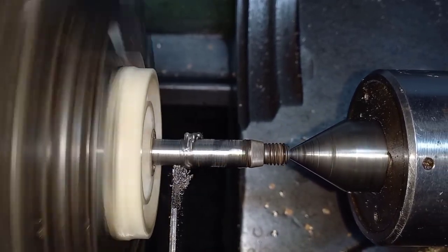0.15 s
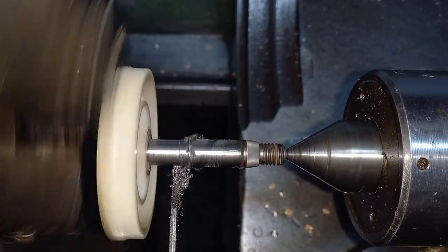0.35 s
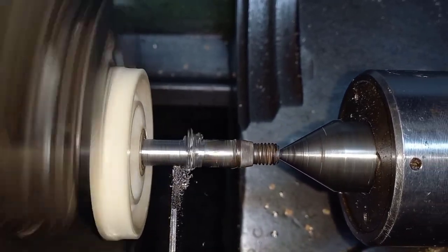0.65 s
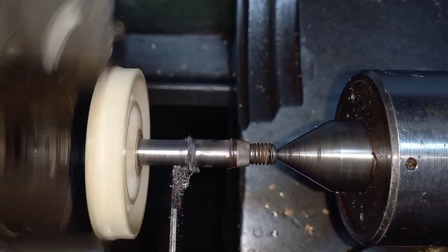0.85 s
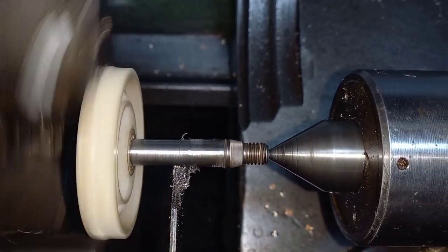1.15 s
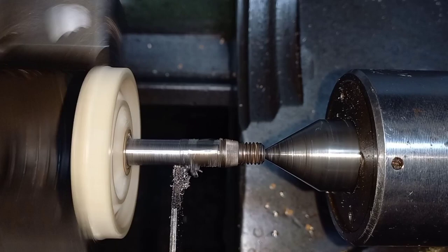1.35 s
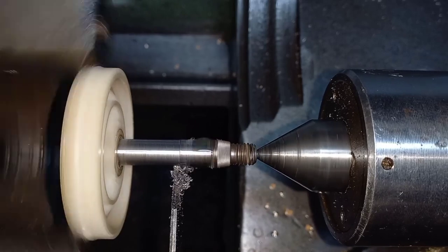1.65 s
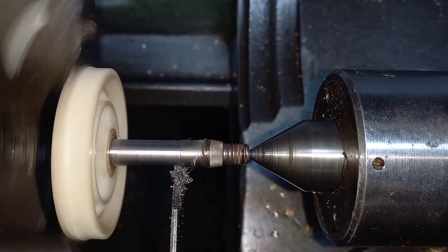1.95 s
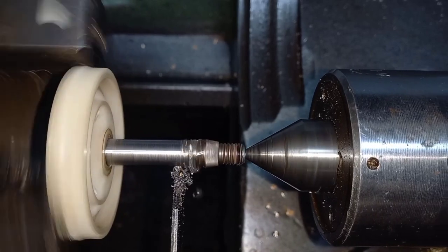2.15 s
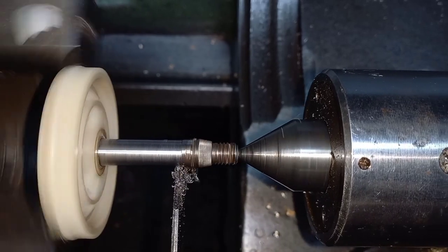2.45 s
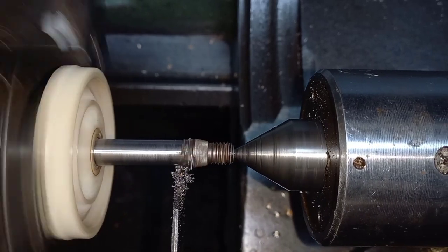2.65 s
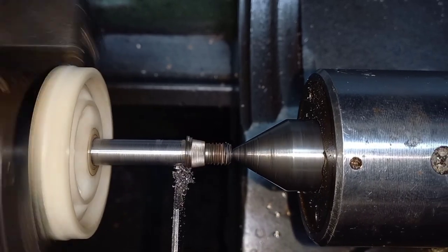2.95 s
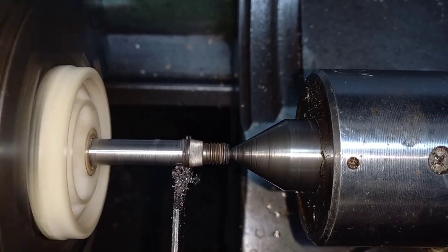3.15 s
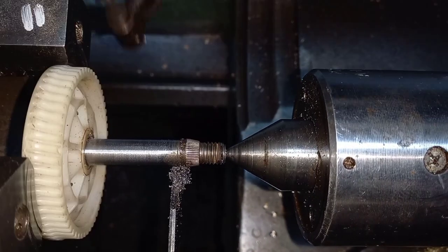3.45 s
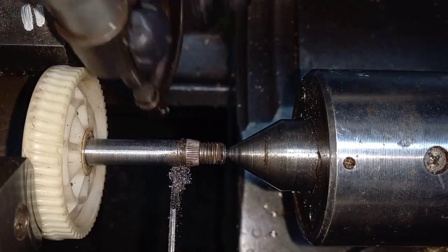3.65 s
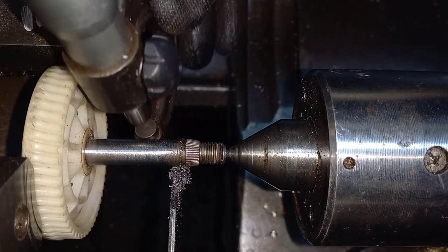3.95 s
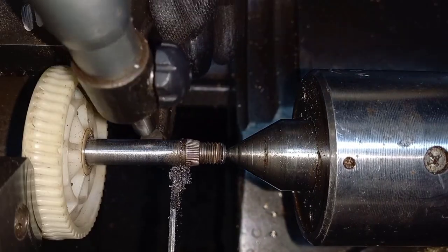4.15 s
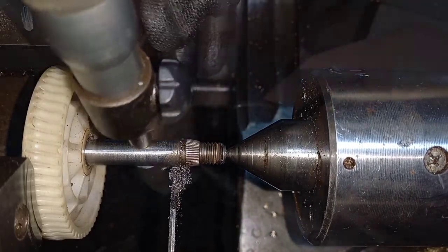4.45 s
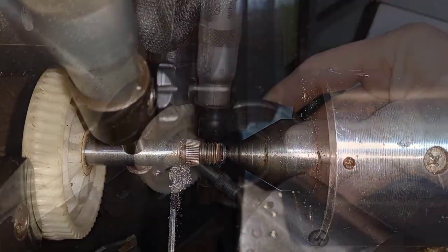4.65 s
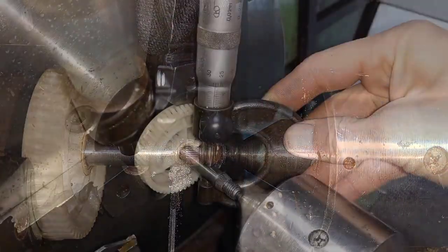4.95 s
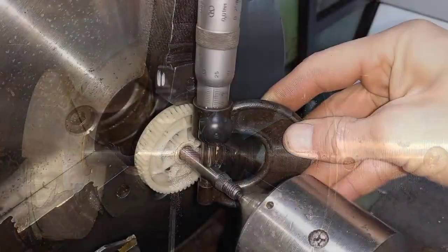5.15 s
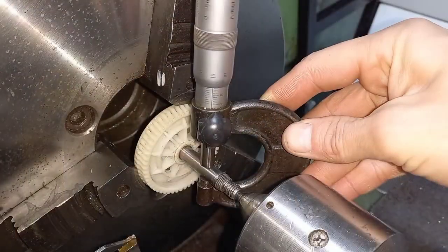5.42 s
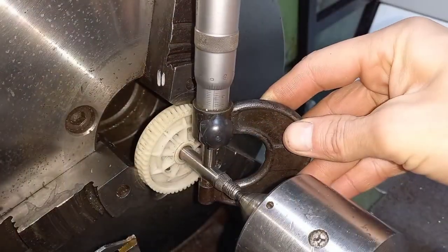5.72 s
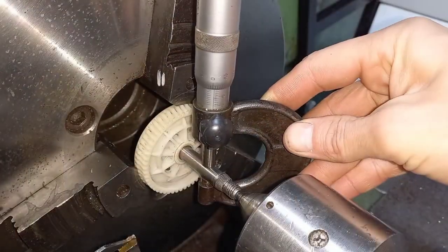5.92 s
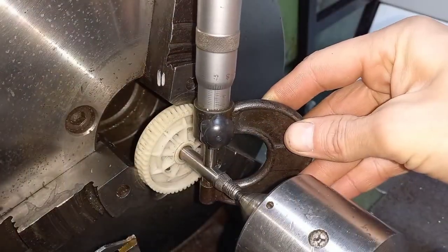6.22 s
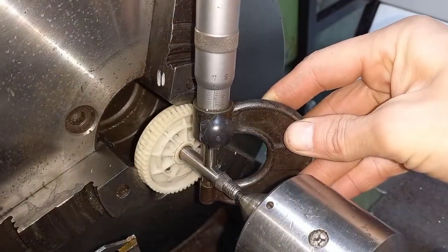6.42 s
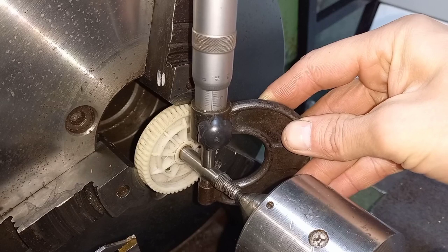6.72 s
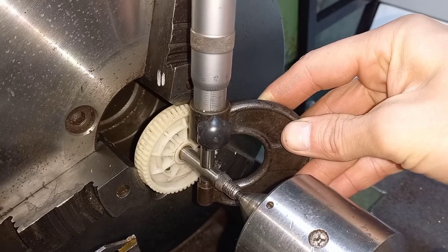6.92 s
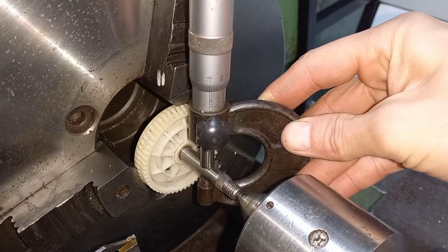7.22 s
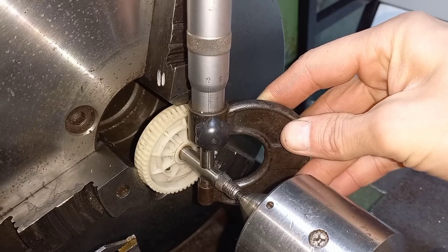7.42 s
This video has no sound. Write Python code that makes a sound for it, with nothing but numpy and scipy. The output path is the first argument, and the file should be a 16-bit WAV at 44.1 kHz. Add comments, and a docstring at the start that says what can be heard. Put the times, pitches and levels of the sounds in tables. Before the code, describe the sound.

In a workshop, a small metal lathe turning a shaft is heard unnaturally fast: steady bright hiss, thin whines and a fast buzzing throb. It cuts abruptly to a much louder, lower idling roar with motor hum and gear chatter. Another hard cut leaves quiet hiss, muffled distant thumps, faint steel ticks and several sharp micrometer ratchet clicks with short echoes. Close stereo microphone.

```python
"""A small metal lathe in a workshop, three scenes cut end to end. First it turns a shaft, heard eight times too fast:
whining tones over shaped noise that throbs once a spindle turn. Then it idles at true speed: hum tones, and noise
that chatters with a shaft. Last it is off: over hiss and dull far thumps (decaying noise), a micrometer ticks on
steel and its ratchet clicks (noise cracks, echo tails and decaying sines)."""
import sys
import numpy as np
from scipy import signal
from scipy.fft import rfft, irfft
from scipy.io import wavfile
from scipy.ndimage import uniform_filter1d

SR = 44100
rng = np.random.default_rng(int(sys.argv[2]) if len(sys.argv) > 2 else 0)


def dump_mix(stems):
    """Bounce the given channels to the path in sys.argv[1] as a 16-bit WAV at rate SR."""
    frames = np.atleast_2d(stems).T  # one column per channel
    limited = np.clip(frames, -1, 1)  # hard clip at full scale
    pcm = np.round(limited * 32767).astype(np.int16)
    wavfile.write(sys.argv[1], SR, pcm)


N = 334278


def amp(db):
    """Decibels to gain."""
    return 10 ** (np.asarray(db) / 20)


def evened(x):
    """Scales the whole array to rms 1."""
    return x / np.sqrt(np.mean(x ** 2) + 1e-20)


def read(points, hz):
    """Interpolates a spectrum on a log-frequency axis."""
    f, value = np.transpose(points)
    return np.interp(np.log(hz + 1), np.log(f + 1), value)


def wander(shape, rate_hz):
    """Low-passed random drift of rms 1 along the last axis."""
    white = rng.standard_normal(shape)
    return evened(signal.lfilter(*signal.butter(1, rate_hz, fs=SR), white))


def bell_db(hz, f, width_hz, height_db):
    """One bell-shaped rise or dip of a spectrum, in dB."""
    return height_db / (1 + (2 * (hz - f) / width_hz) ** 2)


def noise(n, colour, ports, bells=(), patchy_db=0., size=2048):
    """Stereo noise of rms 1 from random short-time spectra with drifting patches, partly alike at the two ports."""
    hop, hz = size // 4, np.fft.rfftfreq(size, 1 / SR)
    a, b, c, d, patches = rng.standard_normal((n // hop + 5, len(hz), 5)).T
    patches = uniform_filter1d(patches, size=size // 128, axis=0)  # over frequency
    patches = evened(uniform_filter1d(patches, size=5, axis=1))  # over time
    db = read(colour, hz) + sum(bell_db(hz, *row) for row in bells)
    level = amp(db[:, None] + patchy_db * patches)
    same, lead_rad, pan_db = (read(np.array(ports)[:, [0, k]], hz)[:, None] for k in (1, 2, 3))
    same = np.clip(same, 0, 1)
    left, other = a + 1j * b, c + 1j * d
    right = same * np.exp(-1j * lead_rad) * left + np.sqrt(1 - same ** 2) * other
    spectra = np.array([left * amp(pan_db / 2), right * amp(-pan_db / 2)]) * level
    return evened(signal.istft(spectra, nperseg=size, noverlap=size - hop)[1][:, :n])


def tones(t, families, strays, ports, slip_rad, waver_db, apart_db, rate_hz):
    """Sines whose phase slips and strength wavers; the balance of the ports can waver too."""
    rows = [(k * base_hz, *row) for base_hz, family in families.items() for k, *row in family]
    out = np.zeros((2, len(t)))
    for hz, db, pan_db in rows + strays:
        drift, both, apart = wander((3, len(t)), rate_hz)
        lead_rad = read(np.array(ports)[:, [0, 2]], hz)
        phase = 2 * np.pi * (hz * t + rng.random()) + slip_rad * drift - np.array([[0], [lead_rad]])
        tilt_db = np.array([[.5], [-.5]]) * (pan_db + apart_db * apart)
        out += np.sqrt(2) * amp(db + waver_db * both + tilt_db) * np.sin(phase)
    return out


# lathe-off noise at the two ports: (frequency [Hz], likeness [0-1], left lead [rad], left minus right [dB])
OFF_PORTS = [(60, 0.97, -0.072, 1), (170, 0.96, -0.28, 1), (350, 0.76, 0.1, -3), (520, 0.48, 0.5, 2),
             (700, 0.23, 0.5, -4.5), (1030, 0.23, 2, -1), (1500, 0.11, 0.6, -3.5), (3000, 0.092, .5, -1.5),
             (15000, .05, .5, 0.5)]
# air and microphone hiss: (frequency [Hz], relative density [dB per Hz])
HISS = [(29, -46), (50, -25), (72, -14), (93, 3), (206, -2), (829, -15), (1030, -18.5), (1370, -19),
        (1740, -26.5), (2820, -26), (4560, -32), (6230, -30.5), (15500, -31.5)]
HISS_DB = -61.5


def hiss(t):
    """Air and microphone hiss: steady shaped noise with drifting patches."""
    return amp(HISS_DB) * noise(len(t), HISS, OFF_PORTS, patchy_db=3.0)


# far blows: (time [s], level [dB], deep part over level [dB], knock over level [dB])
THUMPS = [(4.969, -50.5, -8, -4.5), (5.166, -52.5, -11, -16), (5.195, -55.5, -2, -8),
          (5.401, -49, -0.5, -6.5), (5.571, -49, -15, -6.5), (5.658, -46, -8, -17), (5.789, -59, 1, -4.5),
          (6.025, -55, -15, -7), (6.338, -61, 4, 6), (6.397, -52, -2, -3), (6.499, -52, 2, 5),
          (6.569, -48.5, -4, -6.5), (6.681, -45, -10, -7), (6.719, -53.5, -13, -5), (6.79, -51.5, -14, -17),
          (7.029, -50, -7, -10), (7.177, -56, -11, 0), (7.259, -54, -1, -4.5), (7.369, -55, -15.5, -11),
          (7.448, -49, -13, -13), (7.538, -51, -2, -6.5)]
# registers: (frequency [Hz], relative density [dB per Hz])
DEEP = [(25, -70), (50, -40), (80, -16), (100, -1), (140, 12), (180, -15), (240, -31), (600, -73)]
BOOM = [(50, -69.5), (150, -25), (230, -1), (300, 0), (400, 0.5), (550, -4), (800, -10), (1000, -34),
        (2500, -73)]
KNOCK = [(200, -68.5), (500, -29), (750, 2), (1000, -3.5), (1300, 0), (1550, -9.5), (1800, -16.5),
         (4000, -19.5), (9000, -29), (16000, -54)]
DEEP_T60_S, BOOM_T60_S, KNOCK_T60_S = 0.57, 0.47, .42  # hall decay
DEEP_RISE_S, BOOM_RISE_S, KNOCK_RISE_S = .013, 0.0044, .002  # time constants of power


def thumps(t):
    """Far blows as reverberant noise in three registers: a short swell, then decay; powers add."""
    s, db, deep_db, knock_db = np.transpose(THUMPS)[..., None]
    age = np.maximum(t - s, 0)
    registers = [(DEEP, deep_db, DEEP_RISE_S, DEEP_T60_S),
                 (BOOM, 0, BOOM_RISE_S, BOOM_T60_S),
                 (KNOCK, knock_db, KNOCK_RISE_S, KNOCK_T60_S)]
    out = 0
    for colour, over_db, rise_s, t60_s in registers:
        power = (1 - np.exp(-age / rise_s)) * amp(db + over_db - 60 * age / t60_s) ** 2
        rumble = noise(len(t), colour, OFF_PORTS, patchy_db=0.5, size=1024)
        out = out + np.sqrt(power.sum(axis=0)) * rumble
    return out


# micrometer frame modes: (frequency [Hz], relative level [dB], t60 [s])
FRAME = [(932, 2, 0.068), (1534, -12, 0.086), (2220, -19, 0.025)]
# contact bands: (frequency [Hz], width [Hz], rise or dip before a random weight [dB])
CONTACT_BANDS = [(3490, 100, 8.5), (4560, 140, 0.5), (5280, 170, 10), (6200, 190, 7), (7200, 350, 4),
                 (8650, 340, 2.5), (10050, 300, 2), (12200, 490, -1), (13200, 590, 10), (15300, 550, 5)]
CLICK_RISE_S, CRACK_T60_S = 0.00086, 0.013


def clicks(t, events, colour, pan_db, near_db, near_t60_s, far_db, far_t60_s):
    """Each click: a dense crack of steel, uneven echoes off machine bed and walls, and a frame ring."""
    age, out = np.arange(SR // 4) / SR, np.zeros((2, len(t) + SR))
    hz = np.fft.rfftfreq(len(age), 1 / SR)
    rise = (1 - np.exp(-age / CLICK_RISE_S)) ** 3
    bands_db = np.array([bell_db(hz, *row) for row in CONTACT_BANDS])
    ring = sum(amp(db - 60 * age / t60_s) * np.sin(2 * np.pi * f * age) for f, db, t60_s in FRAME)
    fall = np.hypot(amp(near_db - 60 * age / near_t60_s), amp(far_db - 60 * age / far_t60_s))
    tilt_db = np.array([[[0]], [[-3.]]]) * np.log2(1 + hz / 2000)  # echoes come back duller
    pan = amp([[pan_db / 2], [-pan_db / 2]])
    for s, peak_db, frame_db in events:
        # every contact excites the bands differently
        ringing_db = rng.uniform(.4, 1.17, len(CONTACT_BANDS)) @ bands_db
        spectra = rfft(rng.standard_normal((2, 2, len(age))))
        crack, tail = irfft(spectra * amp(read(colour, hz) + ringing_db + tilt_db), len(age))
        crack *= rise * amp(-60 * age / CRACK_T60_S)
        crack /= abs(crack).max(axis=1, keepdims=True)
        tail = evened(tail) * rise * fall * amp(2.5 * wander(len(age), 150))
        sound = (crack + tail) * pan + amp(frame_db) * rise * ring
        out[:, round((s - t[0]) * SR):][:, :len(age)] += amp(peak_db) * sound
    return out[:, :len(t)]


# gauge touching steel: (time [s], crack peak [dB], frame ring over peak [dB])
TICKS = [(5.281, -51.5, -21), (5.3916, -57, -18), (5.405, -52, -18), (5.471, -48.5, -18),
         (5.509, -50.5, -20), (5.784, -46, -24), (5.7956, -41, -19), (5.8194, -58, -18), (5.863, -53, -22),
         (5.8885, -55, -18), (6.2432, -51, -26), (6.3083, -47, -18), (6.89, -48.5, -14), (6.909, -53, -21),
         (7.0944, -44, -19), (7.374, -49, -4)]
# tick: (frequency [Hz], relative density [dB per Hz])
TICK_COLOUR = [(1500, -20), (3000, -16), (3800, -2.5), (4600, -14.5), (6400, 0.5), (7300, -3.5),
               (9000, -10), (11600, -4), (14500, -18), (16000, -19)]


def ticks(t):
    """The micrometer touching steel: light contacts with long echoes."""
    return clicks(t, TICKS, TICK_COLOUR, pan_db=-1.0, near_db=-13, near_t60_s=0.072, far_db=-18.5, far_t60_s=0.31)


# ratchet teeth slipping: (time [s], crack peak [dB], frame ring over peak [dB])
RATCHET = [(6.3398, -14.5, -34), (6.3716, -13.5, -41), (6.3792, -29, -39), (6.406, -12, -44),
           (6.4657, -12.5, -33), (6.5673, -13, -33), (7.1805, -13.5, -42), (7.2521, -12.5, -37.5)]
# pawl crack: (frequency [Hz], relative density [dB per Hz])
PAWL = [(500, -51.5), (900, -25), (2000, -17), (3000, -18), (4000, -8), (5400, -9.5), (6600, -10),
        (7700, -4), (9200, -5), (10300, -3.5), (11800, 4), (13000, -4.5), (14000, -4.5), (15200, -2),
        (16500, -3)]


def ratchet(t):
    """The micrometer's pawl snapping over ratchet teeth: bright cracks with shorter echoes."""
    return clicks(t, RATCHET, PAWL, pan_db=0.4, near_db=-17.5, near_t60_s=0.061, far_db=-25.5, far_t60_s=0.19)


MAINS_HZ, SHAFT_HZ = 49.91, 13.717
# idling noise: (frequency [Hz], relative density [dB per Hz])
IDLE = [(24, -66), (40, -27), (64, -50), (91, -17), (170, -12), (308, -2), (508, -3), (547, -3.5),
        (923, -9.5), (994, -8.5), (1900, -16), (2900, -21), (9840, -39), (12000, -35), (15400, -43.5)]
IDLE_DB = -25.5
# peaks and dips in the noise: (frequency [Hz], width [Hz], rise or dip [dB])
IDLE_BELLS = [(125, 17, -6), (318, 20, 1), (460, 31, 2.5), (498, 61, -4.5), (606, 29, 4), (618, 39, -3),
              (757, 150, 3), (890, 41, -5.5), (1156, 130, 1.5), (1456, 56, -5.5), (1477, 35, 7.5),
              (1931, 64, 9.5), (3500, 85, 3)]
# tones by base frequency [Hz]: (multiple, level [dB rms], left minus right [dB])
IDLE_TONES = { MAINS_HZ: [(2, -40.5, 1), (3, -48, -1), (4, -46, 0), (5, -47, 0), (7, -45, -14), (8, -43, 2),
              (11, -42, 8), (14, -47, 3), (17, -42, 5), (19, -40, -3), (37, -47, 4)],
              SHAFT_HZ: [(23, -39, -5), (32, -43, 2), (41, -40, 7), (44, -43, 8), (66, -48, 10),
              (78, -55, 9), (82, -49, 8), (88, -55, 5)]}
# tones of no family: (frequency [Hz], level [dB rms], left minus right [dB])
IDLE_STRAYS = [(470.4, -41, 6), (1324.3, -50, -1), (1867.0, -53, -7), (1917.1, -54, 5)]
# ports: (frequency [Hz], likeness [0-1], left lead [rad], left minus right [dB])
IDLE_PORTS = [(60, 1, 0, -6), (144, 0.97, -0.6, 0.5), (340, 0.65, 0.85, -2.7), (520, 0.23, 0.9, 5),
              (697, 1, 1.02, 3.5), (870, 0.37, 0.94, -3), (1055, 0.64, 3, 4.5), (1370, 0.15, 1.5, 0.5),
              (1980, 0.18, 1.05, 2), (3650, 0.16, 3, 0.8), (5000, 0.081, 1.5, 3), (9100, 0.121, 2, -1),
              (15100, 0.2, 6, 2)]


def idling(t):
    """Motor hum and belt roar; loose gears chatter in a pattern that repeats each shaft turn."""
    turn = 2 * np.pi * SHAFT_HZ * (t - 3.59)
    chatter_db = 1.4 * np.cos(turn) + .9 * np.cos(2 * turn) + .6 * np.sin(3 * turn)
    chatter_db += np.cos(5 * turn) + .5 * np.sin(7 * turn)
    body = noise(len(t), IDLE, IDLE_PORTS, IDLE_BELLS, patchy_db=1.7, size=4096)
    roar = signal.sosfiltfilt(signal.butter(2, 1500, fs=SR, output="sos"), body)
    gearbox = signal.sosfiltfilt(signal.butter(2, 2300, fs=SR, output="sos"), body) - roar
    treble = body - roar - gearbox
    depth = np.array([[.6], [1.9], [.95]])  # the ringing gearbox cover pulses most
    gains = amp(depth * chatter_db + 0.38 * wander((3, len(t)), 50))
    rattle = roar * gains[0] + gearbox * gains[1] + treble * gains[2]
    guard = signal.sosfilt(signal.butter(2, [3200, 3750], "band", fs=SR, output="sos"), body)
    rattle += amp(1.5) * np.exp(3.6 * (np.cos(turn) - 1)) * guard  # a guard rings once a turn
    hum = tones(t, IDLE_TONES, IDLE_STRAYS, IDLE_PORTS, slip_rad=0.36, waver_db=2.0, apart_db=0.0, rate_hz=2.6)
    return amp(IDLE_DB) * rattle + hum


SPINDLE_HZ, HUM_HZ, WHINE_HZ, HIGH_WHINE_HZ = 69.104, 798.7, 4585.0, 6153.5  # as heard, sped up
# turning noise: (frequency [Hz], relative density [dB per Hz])
FAST = [(120, -80), (200, -62), (378, -48.5), (742, -28.5), (783, -23), (858, -33), (1190, -24),
        (1300, -25.5), (1810, -12), (3010, -11), (3610, -0.5), (3960, -8), (10000, -11.5), (11000, -10),
        (15500, -12.5)]
FAST_DB = -36.5
# peaks and dips in the noise: (frequency [Hz], width [Hz], rise or dip [dB])
FAST_BELLS = [(510, 30, 3.5), (890, 52, 9), (1080, 60, 5), (1184, 32, 9), (1453, 56, 5.5), (1920, 50, 3),
              (1990, 27, 7.5), (2530, 97, 11), (2510, 60, -5), (2864, 80, 7), (3204, 72, 10),
              (3580, 130, -0.5), (4180, 130, 5.5), (4410, 134, 5.5), (4840, 120, 4), (6150, 270, 0.5),
              (10050, 170, -14), (11900, 600, 0)]
# tones by base frequency [Hz]: (multiple, level [dB rms], left minus right [dB])
FAST_TONES = { SPINDLE_HZ: [(26, -65, 2), (27, -63, 3), (29, -65, 4), (37, -64, -2), (47, -59, 2),
              (48, -62, 1), (50, -62, 3), (51, -51, 4), (52, -47, 4), (54, -55, 7), (55, -58, 3),
              (63, -63, 3), (70, -66, 4), (90, -64, -4), (109, -69, 3)], HUM_HZ: [(1, -65, 0), (2, -71, 0)],
              WHINE_HZ: [(1, -60, 1), (2, -61, 8), (3, -62, 11)], HIGH_WHINE_HZ: [(1, -62, 13),
              (2, -60, 7)]}
# tones of no family: (frequency [Hz], level [dB rms], left minus right [dB])
FAST_STRAYS = [(1190.4, -77, 0), (2494.8, -63, -1), (2895.5, -71, -7), (3412.3, -63, 5), (3628.0, -60, -1),
               (3771.0, -62, 5), (4163.0, -65, 8), (4401.9, -63, 2), (5384.6, -66, 7), (5824.1, -67, -1),
               (5972.8, -66, 9), (7593.1, -61, -8), (7820.9, -69, 1)]
# ports: (frequency [Hz], likeness [0-1], left lead [rad], left minus right [dB])
FAST_PORTS = [(150, .5, 2, 1), (500, .8, -1, .5), (920, 0.97, 0.5, 0), (1400, 0.93, 0, 0),
              (1750, 0.6, -0.9, 1), (2150, 0.68, 0, 1.8), (2600, 0.9, 0.63, -1.5), (3080, 0.63, 0.87, 1),
              (3580, 1, 1.15, 3.5), (4310, 0.37, 0.9, 4), (5270, 0.22, -2.4, -0.2), (6070, 0.5, 1, 1.5),
              (7600, 0, 3, 0.5), (9260, 0.18, 1.6, 2.5), (11000, 0, 4.5, -1), (15000, 0, 2, 2.5)]


def turning(t):
    """Cut and gears, eight times too fast; an uneven shaft makes the noise throb once a turn."""
    turn = 2 * np.pi * SPINDLE_HZ * t
    once_db = 1.2 * np.cos(turn) + .6 * np.cos(2 * turn)
    throb = amp(once_db + 0.2 * wander(len(t), 40))
    body = noise(len(t), FAST, FAST_PORTS, FAST_BELLS, patchy_db=1.3)
    whine = tones(t, FAST_TONES, FAST_STRAYS, FAST_PORTS, slip_rad=0.26, waver_db=1.5, apart_db=-0.5, rate_hz=5.0)
    return amp(FAST_DB) * throb * body + whine


CUT_TO_IDLE_S, CUT_TO_OFF_S = 3.3835, 4.9735


def scene():
    """Turning, idling and lathe off, end to end."""
    fast, idle, off = np.split(np.arange(N) / SR, [round(CUT_TO_IDLE_S * SR), round(CUT_TO_OFF_S * SR)])
    fade_in = np.minimum((idle - idle[0]) / .007, 1)
    lathe_off = hiss(off) + thumps(off) + ticks(off) + ratchet(off)
    return np.concatenate([turning(fast), fade_in * idling(idle), lathe_off], axis=1)


EDGE_HZ = 16600


def record(dry):
    """The microphone loses deep bass; the top of the band is shelved down, then cut."""
    thin = signal.sosfilt(signal.butter(2, 40, "high", fs=SR, output="sos"), dry)
    shelf = signal.firwin2(1023, [0, 15480, 15600, SR / 2], [1, 1, .05, .05], fs=SR)
    edge = signal.firwin(511, EDGE_HZ, window=("kaiser", 9), fs=SR)
    return signal.oaconvolve(thin, np.convolve(shelf, edge)[None], "same")


dry = scene()
out = record(dry)
dump_mix(out)
```